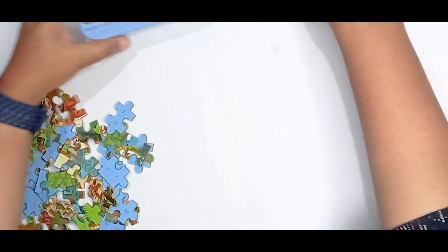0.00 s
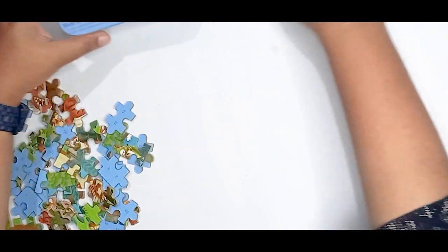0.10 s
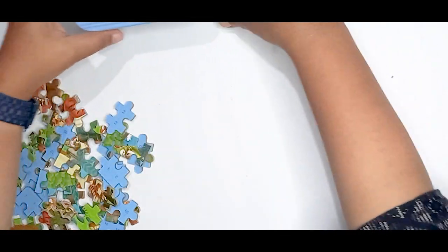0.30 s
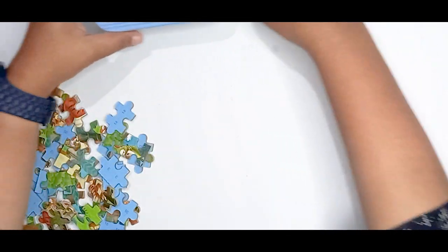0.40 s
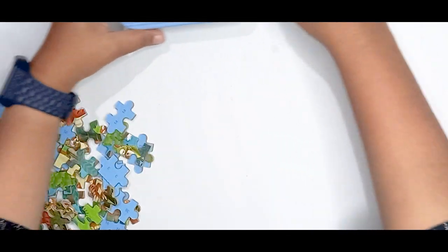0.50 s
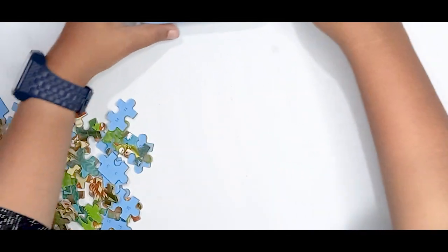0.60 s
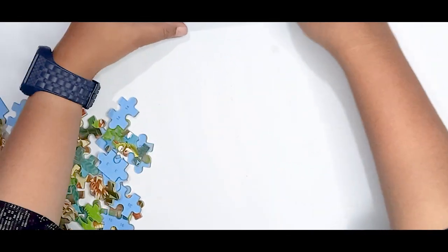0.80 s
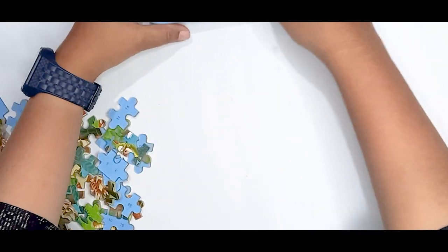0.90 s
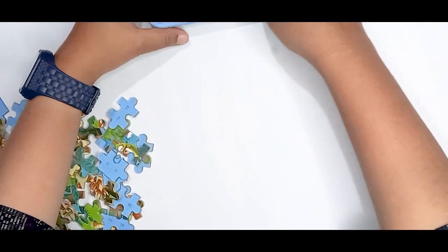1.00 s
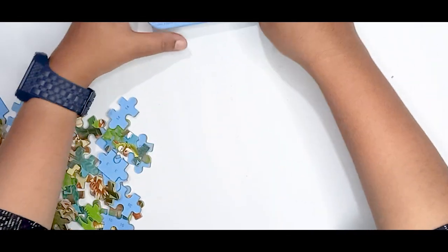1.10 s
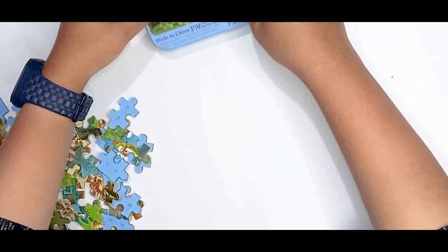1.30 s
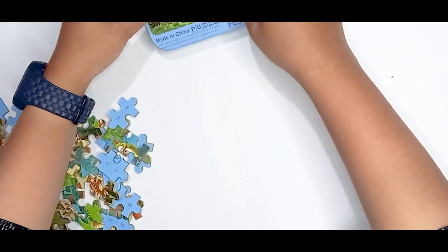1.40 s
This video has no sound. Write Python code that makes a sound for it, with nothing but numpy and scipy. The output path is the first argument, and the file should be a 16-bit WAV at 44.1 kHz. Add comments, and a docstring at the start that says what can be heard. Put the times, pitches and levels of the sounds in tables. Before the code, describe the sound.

Hands shift a puzzle box, giving uneven clacks and ringing knocks with loose pieces clattering, short slides and table bumps, fading to faint taps; picked up close above the table in a small, lively, quiet room.

```python
"""In a small, hard-walled room, hands shift a box of jigsaw pieces on a table.
Loose pieces clack and bump: bursts of tiny contacts, coloured by many uneven resonances.
Five firm blows ring the box, made of fading sine waves, and one snap adds a bright ring.
Around them come short scrapes of friction grains and the low shudder of the pushed table.
Fading noise makes the room's answer, and steady coloured noise the faint air."""
import sys
import numpy as np
from scipy import signal
from scipy.fft import rfft, irfft
from scipy.io import wavfile

SR = 44100
rng = np.random.default_rng(int(sys.argv[2]) if len(sys.argv) > 2 else 0)


def unload_audio(sound):
    """Save the sound as a 16-bit wav file, at the path given as the first command line argument."""
    columns = np.transpose(np.atleast_2d(sound))
    # keep every value between -1 and 1, then stretch to whole-number steps
    steps = np.round(np.clip(columns, -1, 1) * 32767)
    wavfile.write(sys.argv[1], SR, steps.astype(np.int16))


N = 66150  # 1.5 seconds of samples
EDGE_HZ = 15900  # top of the recorder's range


def amp(db):
    """Turns decibels into a gain."""
    return 10 ** (np.asarray(db) / 20)


def unit(x):
    """Scales a sound to an rms (average strength) of one."""
    return x / np.sqrt(np.mean(x ** 2) + 1e-20)


def read(points, hz):
    """Reads a table between its points, along a log-frequency axis."""
    point_hz, value = np.transpose(points)
    return np.interp(np.log(hz + 1), np.log(point_hz + 1), value)


def add(mix, start_s, sound):
    """Mixes a sound in at a time, cutting it off at the end of the mix."""
    part = mix[round(start_s * SR):][:len(sound)]
    part += sound[:len(part)]


def colour(x, points, size=4096):
    """Filters with the given (Hz, dB) shape, responding as early as possible and never ahead."""
    hz = abs(np.fft.fftfreq(size, 1 / SR))
    log_gain = np.log(amp(read(points, hz)))
    # The Hilbert transform finds the minimum phase that goes with this gain
    response = np.exp(np.conj(signal.hilbert(log_gain)))
    taps = np.fft.ifft(response).real
    return signal.fftconvolve(x, taps[:size // 2])[:len(x)]


def grains(per_s, spread_db):
    """Tiny contacts as single-sample pulses of random time and sign; the spread varies their size."""
    size = amp(spread_db * np.minimum(rng.exponential(1, N), 4))
    sign = rng.choice([-1., 1.], N)
    happens = rng.random(N) < per_s / SR
    return unit(size * sign * happens)


def ring(modes):
    """Fading sine waves, as in a struck solid, each starting at a random point of its swing."""
    t = np.arange(SR // 2) / SR
    out = np.zeros(len(t))
    for hz, db, t60 in modes:
        out += amp(db - 60 * t / t60) * np.sin(2 * np.pi * (hz * t + rng.random()))
    return out


# How fast the room's answer fades at each pitch.
# Each row: frequency in Hz, time to fall by 60 dB in seconds (a negative time makes it grow).
ROOM_FADE = [(100, -0.15), (400, 0.41), (1200, 0.5152), (3000, 0.33), (7000, 0.3756), (14000, 0.52)]
# How strong the room's answer is at each pitch. Each row: frequency in Hz, level in dB.
ROOM_LEVEL = [(150, -2.5), (1200, -6.5), (3000, -2.5), (7000, -9), (12000, -16.5)]
ROOM_BUILD_S = 0.004


def room_tail():
    """Dense reflections as noise that builds up quickly, then follows its own fade at each pitch."""
    hz, t, noise = signal.stft(rng.standard_normal(N), SR, nperseg=256)
    fade = amp(-60 * t / read(ROOM_FADE, hz)[:, None])
    shape = fade * (1 - np.exp(-t / ROOM_BUILD_S))
    # Even out the energy of each band before setting its level
    band_size = np.sqrt(N * np.mean(shape ** 2, axis=1, keepdims=True))
    shape *= amp(read(ROOM_LEVEL, hz))[:, None] / band_size
    return signal.istft(noise * shape, SR, nperseg=256)[1][:N]


# The balance of the steady room air. Each row: frequency in Hz, relative level in dB per Hz.
AIR_SPECTRUM = [(25, 9.5), (60, -2), (110, -3.5), (200, -7.5), (400, -16.5), (1000, -20.5), (2500, -27.5),
                (4500, -26), (7000, -18), (9000, -25.5), (15000, -31.5)]
AIR_DB = -64  # overall level


def air():
    """Faint steady rumble and hiss: noise shaped in frequency."""
    spectrum = rfft(rng.standard_normal(N))
    spectrum *= amp(read(AIR_SPECTRUM, np.fft.rfftfreq(N, 1 / SR)))
    return amp(AIR_DB) * unit(irfft(spectrum, N))


# Pushes that shake the table. Each row: start in seconds, level in dB, length of contact in seconds.
TABLE_PUSHES = [(0.176, -55.5, 0.0076), (0.238, -43, 0.015), (0.306, -48, 0.01), (0.623, -63, 0.0008),
                (0.666, -58, 0.0023), (0.765, -46.5, 0.017), (0.803, -45.5, 0.011), (0.897, -43, 0.0236),
                (0.977, -49, 0.013), (1.151, -56, 0.019), (1.318, -60.5, 0.007)]
# The table's own tones. Each row: frequency in Hz, level in dB, time to fall by 60 dB in seconds.
TABLE_TONES = [(52.45, 2.5, 0.535), (73.9, 7, .4), (104, -0.5, .25), (151, 5.5, 0.17), (205, 2, 0.117)]


def table():
    """The table shudders under each push; a shorter push reaches its higher tones."""
    t = np.arange(N) / SR
    shudder = np.zeros(N)
    for hz, db, t60 in TABLE_TONES:
        shudder += amp(db - 60 * t / t60) * np.cos(2 * np.pi * hz * t)
    pushing = np.zeros(N)
    for start_s, db, contact_s in TABLE_PUSHES:
        force = np.hanning(round(contact_s * SR))
        add(pushing, start_s, amp(db) * force / force.sum())
    return signal.fftconvolve(pushing, shudder)[:N]


# Slides of the box and pieces.
# Each row: start in seconds, length in seconds, then the low, middle and high part's levels in dB.
SCRAPE_STROKES = [ (0.165, 0.1, -60.5, -69.5, -60), (0.232, 0.019, -44.5, -49.5, -43.5),
                  (0.775, 0.0365, -67, -44, -52), (0.875, 0.088, -64, -76, -74),
                  (0.945, 0.076, -57, -61, -89), (1.087, 0.037, -82, -56, -72),
                  (1.246, 0.072, -70, -58, -67.5), (1.367, 0.03, -83, -88, -71.5),
                  (1.461, 0.07, -64.5, -65.5, -73), ]
# The sound of each of the three parts. Each row: frequency in Hz, level in dB.
LOW_SPECTRUM = [(30, -18), (90, 8), (200, 5.5), (400, -4), (1000, -70.5)]
MID_SPECTRUM = [(200, -21.5), (600, 0), (1150, 6), (1600, 0), (2200, -5.5), (4000, -11), (9000, -39)]
HIGH_SPECTRUM = [(1500, -25.5), (4000, 2.5), (6700, 16.5), (9000, 4.5), (11000, 9.5), (16000, -12)]
SCRAPE_GRAINS_PER_S, SCRAPE_GRAIN_DB = 2000, 0  # a spread of 0 dB makes all grains alike
SCRAPE_WET_DB = 1  # how much of the scrapes reaches the room


def scrapes():
    """Short slides: fine friction grains in a low, a middle and a high part."""
    out = np.zeros(N)
    for part, spectrum in enumerate([LOW_SPECTRUM, MID_SPECTRUM, HIGH_SPECTRUM]):
        stroke = np.zeros(N)
        for start_s, length_s, *levels_db in SCRAPE_STROKES:
            swell = signal.windows.tukey(round(length_s * SR), .75)
            add(stroke, start_s, amp(levels_db[part]) * swell)
        friction = colour(grains(SCRAPE_GRAINS_PER_S, SCRAPE_GRAIN_DB), spectrum)
        out += stroke * unit(friction)
    return out + amp(SCRAPE_WET_DB) * signal.fftconvolve(out, room_tail())[:N]


# Blows on the box: the spot struck favours tones near one pitch, and the grip can shorten the ring.
# Each row: start in seconds, level in dB, favoured pitch in Hz, spread around it in octaves,
# share of the free ring time (1 is all of it).
BLOWS = [ (0.2477, -28, 1830, 0.74, 1.0), (0.5247, -41.5, 1110, 0.41, 1.0), (0.6226, -25, 1275, 0.02, 0.84),
         (0.8047, -27.5, 850, 0.44, 0.41), (1.1131, -35.5, 1060, 0.21, 0.75), ]
# The box's own tones. Each row: frequency in Hz, level in dB, free time to fall by 60 dB in seconds.
BOX_TONES = [(550.5, -4.5, .3), (889.5, -3.5, 0.17), (934.5, -3.5, 0.4), (1058, -7.5, .42),
             (1104, -9.5, 0.37), (1165, -2, .28), (1255, -6.5, 0.15), (1393, -4.5, 0.4), (1433, -13, 0.49),
             (1944, -5, 0.15), (2003, -2.5, .22), (2042, -2.5, 0.18), (2435, 0.5, 0.2), (2590, -6.5, 0.26),
             (3256, -2.5, .22), (3460, -12, .18), (3880, -1, .22), (5260, -2, 0.25)]
# Bright tones of the sharpest snap of a piece against the box.
# Each row: frequency in Hz, level in dB, time to fall by 60 dB in seconds.
SNAP_TONES = [(3048, 0, 0.14), (3706, -12, 0.32), (4230, -0.5, 0.13), (4530, 2.5, 0.11), (4860, 0, .2),
              (4950, -2, 0.18), (5848, -14.5, 0.22), (6300, 0, 0.18), (7150, 6, 0.063), (7800, 3, 0.11)]
SNAP_S, SNAP_DB = .5252, -30  # start and level
BOX_WET_DB = -4  # how much of the box's ring reaches the room


def box():
    """The box rings at its own tones after each firm blow, and brightly after the snap."""
    out = np.zeros(N)
    for start_s, db, favoured_hz, spread, free_share in BLOWS:
        modes = []
        for hz, level_db, t60 in BOX_TONES:
            distance = np.log2(hz / favoured_hz) / spread
            loss_db = 10 * np.log10(1 + distance ** 2)
            modes.append((hz, level_db - loss_db, t60 * free_share))
        add(out, start_s, amp(db) * ring(modes))
    add(out, SNAP_S, amp(SNAP_DB) * ring(SNAP_TONES))
    return out + amp(BOX_WET_DB) * signal.fftconvolve(out, room_tail())[:N]


PEAKS_FROM_HZ, PEAKS_DB = 2500, 4.5  # where the resonances reach full strength, and how strong


def rattle(count=110):
    """The uneven response of whichever pieces collide: close peaks and dips, as (Hz, dB)."""
    hz = np.linspace(0, EDGE_HZ, count)
    depth = np.interp(hz, [0, PEAKS_FROM_HZ / 2, PEAKS_FROM_HZ], [0, 0, PEAKS_DB])
    peaks_db = depth * np.clip(rng.standard_normal(count), -2, 2)
    # Peaks add more power than dips remove, so lower the whole curve to match
    return list(zip(hz, peaks_db - depth ** 2 * np.log(10) / 20))


# Where the six strengths of a knock apply. The list holds frequencies in Hz, from thud to fizz.
BANDS_HZ = [180, 520, 1050, 2900, 6000, 12000]
CONTACTS_PER_S, CONTACT_SPREAD_DB = 3200, 3


def knock(levels_db, hold_s, t60, first_db):
    """A first contact and a clatter of loose pieces that holds, then fades, with the room's answer."""
    t = np.arange(N) / SR
    fade = amp(-60 * np.maximum(t - hold_s, 0) / t60)
    clatter = grains(CONTACTS_PER_S, CONTACT_SPREAD_DB) * fade
    clatter /= np.linalg.norm(clatter)
    clatter[0] -= amp(first_db)
    sound = colour(clatter + room_tail(), rattle())
    return colour(sound / np.linalg.norm(sound), list(zip(BANDS_HZ, levels_db)))


# The clacks and bumps. Each row: start in seconds, six levels in dB before the common colour
# (thud, body, knock, clack, click, fizz), how long the clatter holds in seconds, its time to
# fall by 60 dB in seconds, first contact in dB relative to the clatter.
KNOCK_EVENTS = [ (0.176, 0, -17.5, -25, -26, -23.5, -16, 0.015, 0.087, -16.5),
                (0.248, 17.5, 11, 10.5, 17, 7, -2, .001, .27, -8),
                (0.5234, 0.5, 9.5, 5, 10.5, 13.5, 10.5, 0.0053, 0.13, -17),
                (0.6233, -8.5, -1, -1.5, -1.5, 1, 0.5, 0.0064, 0.079, -10.5),
                (0.8039, 3, 11.5, 13, 7, 2.5, -2.5, 0.0089, 0.09, -10.5),
                (0.8273, 1, -10, 2.5, -14.5, 1, -6.5, 0.0041, 0.13, -9),
                (0.94, -2.5, 1.5, -5, -25, -35, -26, 0.028, 0.022, -10),
                (1.1113, -7.5, -2, -1, -3, 0, -3, 0.022, 0.13, -22),
                (1.182, -13, -15.5, -20, -13.5, -27, -15, 0.026, 0.16, -8),
                (1.322, -4.5, -12, -25, -37, -45, -43, 0.01, 0.095, -10.5),
                (1.4010, -31, -21, -43, -37, -53, -36, 0.0022, 0.025, -4), ]
# Colour common to all knocks. Each row: frequency in Hz, level in dB.
KNOCK_COLOUR = [(30, -27), (110, -4.5), (240, -2), (400, -7), (560, -2), (720, -3.5), (1000, 4), (1650, -4),
                (2400, -3.5), (4200, -3), (7500, 1.5), (8600, -8.5), (10400, -4), (12500, -20.5),
                (16000, -20)]


def knocks():
    """All clacks and bumps of the pieces, in their common colour."""
    out = np.zeros(N)
    for start_s, *levels_db, hold_s, t60, first_db in KNOCK_EVENTS:
        add(out, start_s, knock(levels_db, hold_s, t60, first_db))
    return colour(out, KNOCK_COLOUR)


def scene():
    """Everything at one microphone above the table."""
    return (knocks() + box() + scrapes() + table() + air())[None]


def record(dry):
    """The recorder's band limit: a steep filter that removes the highest treble."""
    low_pass = signal.firwin(511, EDGE_HZ, window=("kaiser", 9), fs=SR)
    return signal.oaconvolve(dry, low_pass[None], "same")


dry = scene()
out = record(dry)
unload_audio(out)
```